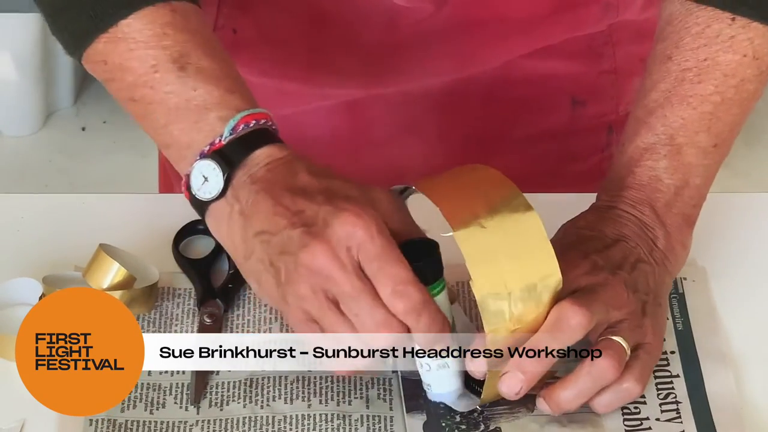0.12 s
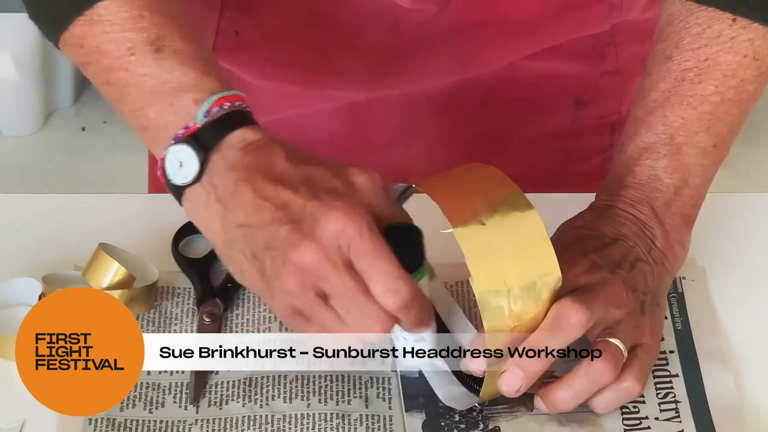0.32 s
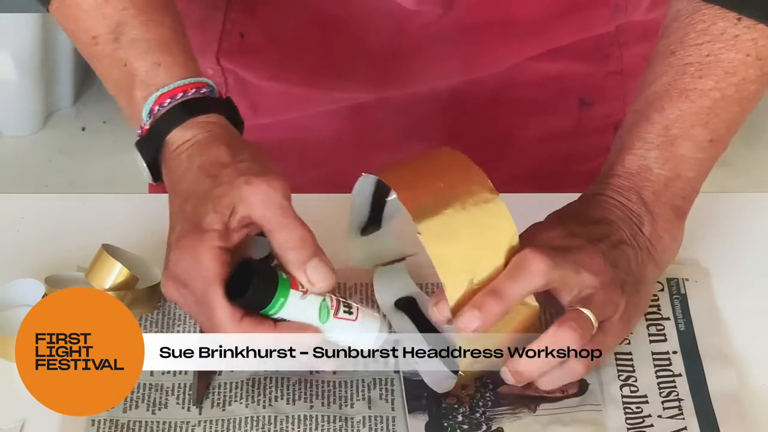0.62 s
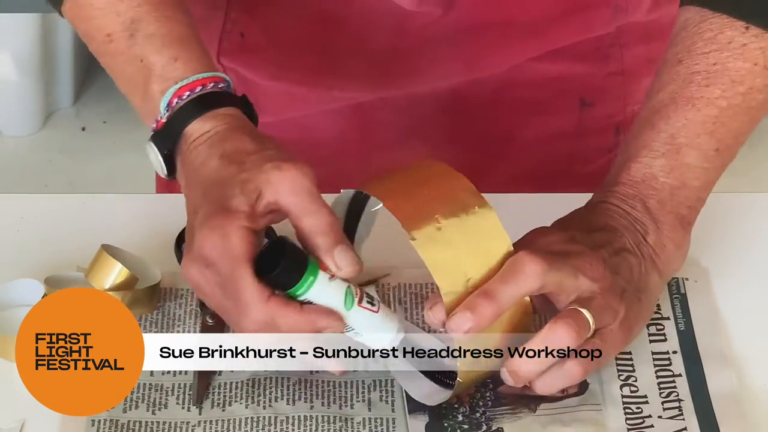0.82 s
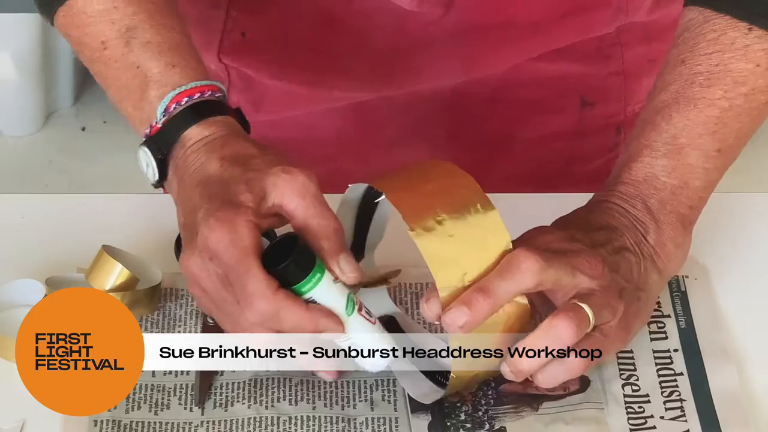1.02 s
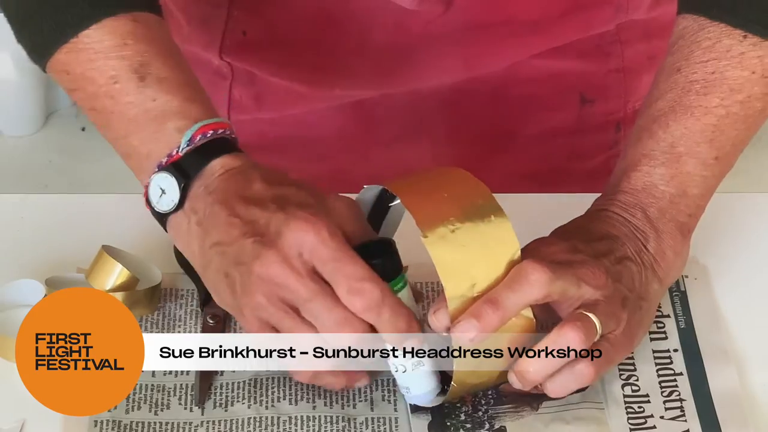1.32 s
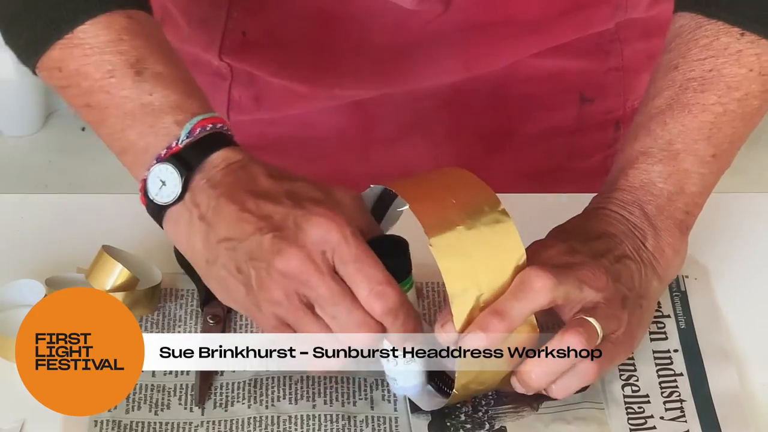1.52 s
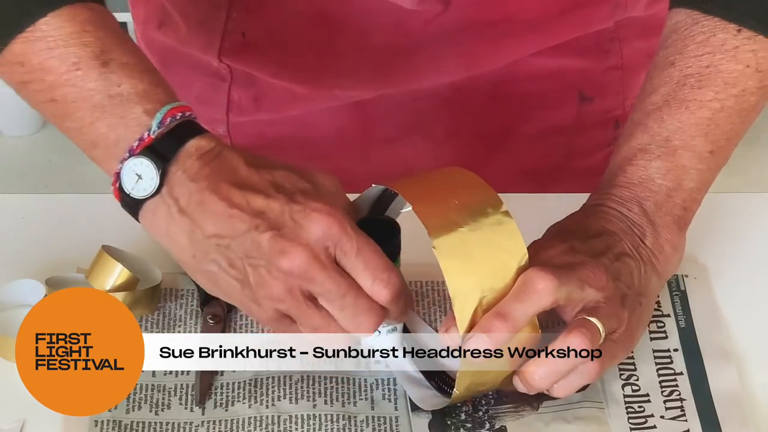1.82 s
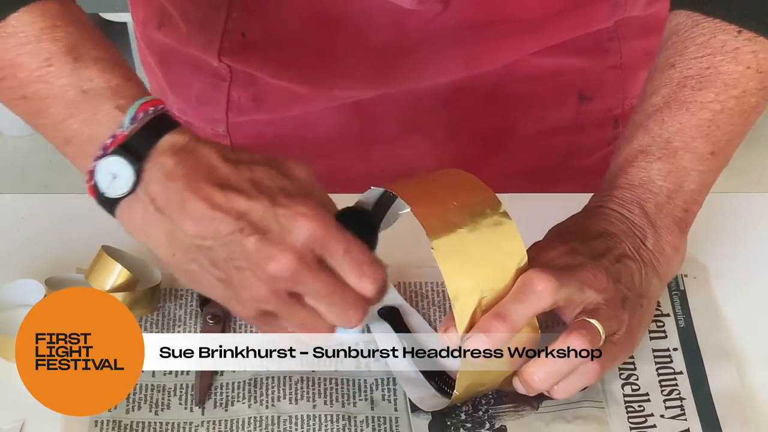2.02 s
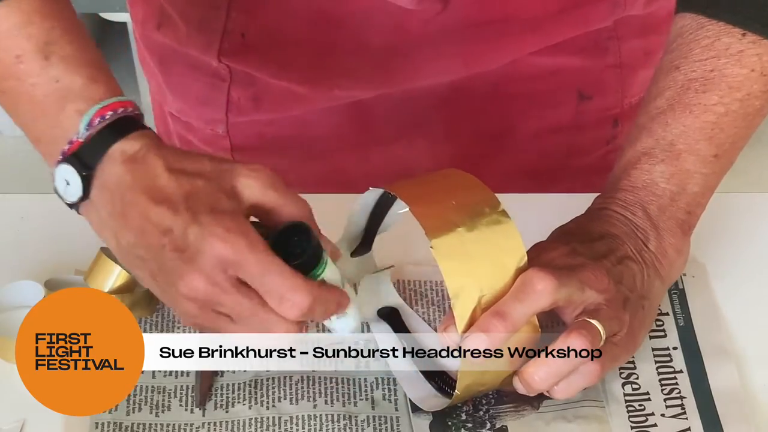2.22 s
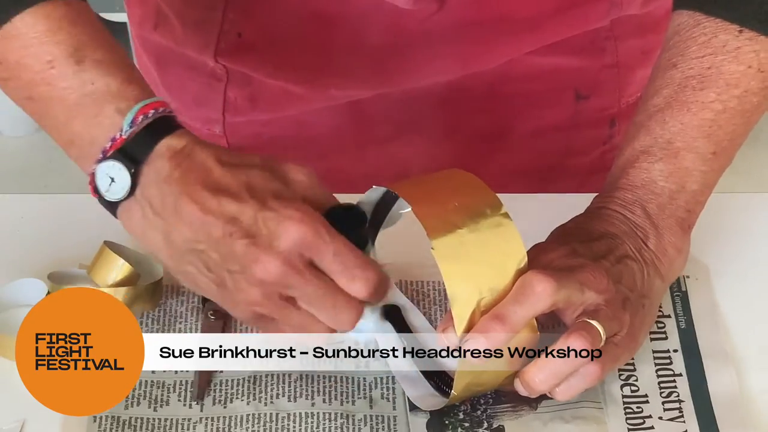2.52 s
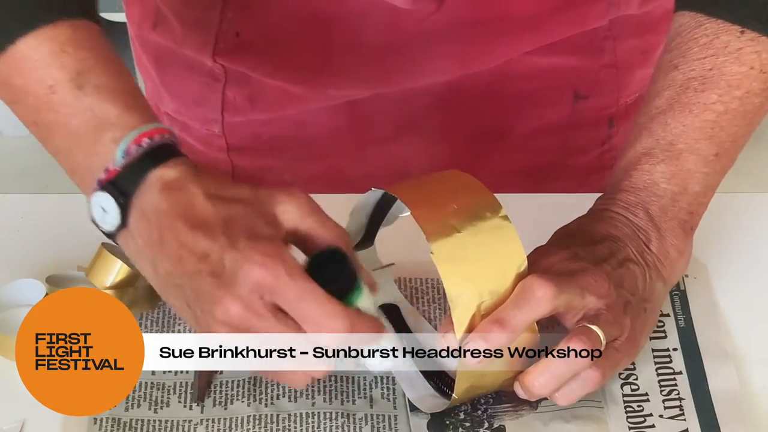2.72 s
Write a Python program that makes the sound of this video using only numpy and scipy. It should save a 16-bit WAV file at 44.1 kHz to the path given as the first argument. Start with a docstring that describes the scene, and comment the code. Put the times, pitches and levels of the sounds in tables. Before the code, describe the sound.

Close, dry foil crackles, a sharp cluster first, scattered small ticks, a quiet gap, another bright snap, faint sticky slides and a run of low hand thuds on a table, in a small indoor room with wavering hum.

```python
"""A low, unevenly wavering rumble and a faint rustle, then sharp foil snaps, in a bare room.
A glue stick is dabbed and dragged along stiff foil paper bent into a band on a table.
Snaps are bursts into resonators, rustle is dense random grains, the sticky tip's slides are gliding
noise bands, and a hand's bumps, mostly one quick run, ring the table's modes. The rumble is a narrow
noise band in level lumps. Two microphone ports hear the treble with a phase lag between them."""
import sys
import numpy as np
from scipy import signal
from scipy.fft import rfft, irfft, next_fast_len
from scipy.io import wavfile
from scipy.ndimage import uniform_filter1d

SR = 44100
rng = np.random.default_rng(int(sys.argv[2]) if len(sys.argv) > 2 else 0)


def level_to_linear(level):
    """Convert decibel levels to linear amplitude factors, elementwise."""
    exponent = np.asarray(level, float) / 20
    return 10 ** exponent


def to_wav(s):
    """Save 16-bit WAV."""
    ch = np.atleast_2d(s).T  # columns
    pcm = np.round(np.clip(ch, -1, 1) * 32767)  # PCM
    wavfile.write(sys.argv[1], SR, pcm.astype(np.int16))


N = 125685

# room floor spectrum: hz, level_db_per_hz
AIR_SPECTRUM = [(20, -24), (66, -13), (105, -9.5), (174, -47.5), (511, -27), (889, -38.5), (1730, -40),
                (5240, -49), (13400, -54), (15000, -54)]
# random level lumps of the rumble's narrow noise band: peak_db, centre_s
RUMBLE_LUMPS = [(-43, 0.012), (-53, 0.168), (-53.5, 0.505), (-44, 0.69), (-49.5, 0.952), (-53, 1.149),
                (-45.5, 1.328), (-53, 1.43), (-57.5, 1.792), (-48, 1.973), (-48, 2.235), (-53.5, 2.35),
                (-38.5, 2.499), (-45, 2.679), (-52.5, 2.819)]
# reverberation: hz, t60_s
ROOM_DECAY = [(1400, 0.47), (3700, 0.44), (9700, 0.26), (15000, 0.12)]
# left-right likeness of diffuse sound: hz, likeness_0_to_1
STEREO_LIKENESS = [(60, .9), (250, .8), (600, .3), (3000, .1), (6500, .1), (8000, .97), (15000, .97)]
# hand contacts on the table: start_s, level_db
TABLE_BUMPS = [(2.426, -29.5), (2.445, -28), (2.465, -29.5), (2.497, -33.5), (2.524, -34), (1.869, -43.5)]
# table top modes: pitch_hz, level_db, t60_s
TABLE_MODES = [(106.5, -20.5, 0.3), (153.6, -1, 0.1), (203.5, -2.5, 0.1), (269.9, 0, 0.1), (342, -8.5, .07),
               (431.3, -9, 0.07), (560, -14, 0.05)]
# sticky tip strokes: start_hz, end_hz, start_s, end_s, level_db
TIP_SLIDES = [(3150, 4250, 1.1, 1.36, -76), (4200, 4400, 1.3, 1.58, -73), (6770, 7100, 1.63, 1.85, -75),
              (4480, 4614, 2.147, 2.38, -68), (3720, 3640, 2.29, 2.49, -64), (4250, 3650, 2.26, 2.34, -67)]
# noise bandwidth of each stroke: width_hz
TIP_WIDTHS = [600, 800, 410, 1200, 130, 250]
# bent band resonances: pitch_hz, width_hz
BAND_RESONANCES = [(730, 60), (1220, 240), (1600, 90), (2350, 200), (2880, 200), (3730, 240), (4560, 300)]
# rustling rubs: start_s, length_s, body_db, body_centre_hz, treble_db
FOIL_RUBS = [(-.1, 0.23, -63, 1490, -99.5), (0.197, 0.044, -43, 1260, -36), (0.21, 0.15, -44, 3730, -41),
             (0.423, 0.1, -51, 1220, -66.5), (0.58, 0.034, -57, 2760, -53.5), (0.578, 0.093, -55, 480, -71),
             (0.909, 0.059, -57.5, 3190, -57), (1.149, 0.015, -94, 5930, -65),
             (1.299, 0.03, -65, 4330, -60), (1.36, 0.027, -70.5, 4870, -58.5),
             (1.441, 0.03, -65.5, 4640, -59.5), (1.527, 0.073, -70.5, 3690, -57.5),
             (1.548, 0.16, -68, 2000, -70), (1.756, 0.033, -77, 4440, -53), (1.8646, 0.06, -45, 4600, -31),
             (1.873, 0.24, -67.5, 1180, -53), (1.927, 0.18, -52, 4100, -51.5),
             (0.692, 0.17, -59, 3500, -69.5), (2.222, 0.28, -66.5, 1972, -83.5),
             (2.456, 0.06, -71, 5920, -54), (2.485, 0.049, -58.5, 760, -45),
             (2.533, 0.1, -58.5, 3700, -47.5)]
# rub body spectrum: hz, level_db_per_hz
BODY_SPECTRUM = [(250, -20.5), (500, 0), (1000, 3), (3000, -6.5), (6000, -2), (9000, -18), (16000, -48.5)]
# rub treble spectrum: hz, level_db_per_hz
TREBLE_SPECTRUM = [(3500, -7.5), (6000, -3), (8000, 0), (10500, -1), (14500, -4), (15300, -31)]
# foil snaps: start_s, body_peak_db, body_pitch_hz, treble_peak_db
FOIL_SNAPS = [(0.134, -46.5, 909, -90), (.198, -36.5, 1240, -29), (0.2141, -24.5, 1260, -15.5),
              (0.2201, -33, 4560, -7.5), (0.231, -42, 4400, -33.5), (0.238, -45, 1250, -21),
              (.300, -25, 2180, -56), (0.3048, -29, 2830, -41.5), (0.4444, -34.5, 1250, -61),
              (0.4441, -33.5, 2960, -64), (0.478, -30.5, 2524, -60), (0.6893, -23, 3924, -55.5),
              (.690, -41.5, 1480, -70), (0.693, -30, 2730, -61.5), (1.555, -62, 3980, -45.5),
              (1.864, -32, 2300, -15), (1.8661, -30.5, 1096, -23.5), (1.91, -26.5, 3960, -36),
              (1.917, -30, 3780, -42), (2.021, -31, 2990, -45), (2.546, -35, 3620, -40),
              (2.8465, -34.5, 1300, -78)]
# treble colour of the snaps as the microphone hears it, bright bands: centre_hz, width_hz, level_db
SNAP_TREBLE_BANDS = [(7470, 380, -2), (10400, 1100, 4.5), (13200, 5300, 2)]
# phase between the microphone ports: hz, left_lead_rad
PORT_LEAD = [(20, 0), (6500, 0), (8750, -np.pi), (10300, -2 * np.pi), (11850, -3 * np.pi),
             (15000, -5 * np.pi), (22050, -9 * np.pi)]

AIR_DB = -62.5
RUMBLE_HZ, RUMBLE_WIDTH_HZ, RUMBLE_SIDE_DB = 106, 10.7, -12
LUMP_S, BETWEEN_LUMPS_DB = 0.037, -57
ROOM_DB, ROOM_GAP_S = -4, 0.0046
ROOM_TREBLE_DB_PER_OCTAVE = -0.5  # for band lower edges above 2 kHz
CONTACT_SPREAD_S, MODE_SPREAD_DB = 0.00274, 2
TABLE_PAN_DB, TABLE_TO_ROOM_DB = -1.94, -14
SLIDE_FADE_S, SLIDE_SAG_DB = 0.045, -5
BAND_DIRECT_DB = -9
GRAINS_PER_S, GRAIN_SPREAD_DB, FLICKER_DB = 6000, 2, 2.5
RUB_FALL_S, RUB_SAG_DB, RUB_WIDE_DB, RUB_Q = 0.027, -9.5, -0.5, 2.6
RUB_RISE_S, RISE_REFERENCE_DB, RISE_PER_DB = 0.003, -42.5, 1.3  # softer rubs rise slower
SNAP_DECAY_S, SNAP_ROUGHNESS, SNAP_SAMPLES = 0.0012, 0.8, 400
SNAP_Q, EDGE_DB = 2.5, -13.5


def rms_one(x):
    """Scales to unit rms."""
    return x / np.sqrt(np.mean(x ** 2) + 1e-20)


def at_hz(points, size):
    """Reads a table on the FFT grid of that many samples, over log frequency."""
    hz, value = np.transpose(points)
    grid_hz = np.arange(size // 2 + 1) * SR / size
    return np.interp(np.log(grid_hz + 1), np.log(hz), value)


def colour(x, spectrum):
    """Shapes noise to a spectrum at unit rms."""
    return rms_one(irfft(rfft(x) * level_to_linear(at_hz(spectrum, N)), N))


def resonance(x, hz, width_hz):
    """One damped mode: a two-pole resonator."""
    r = np.exp(-np.pi * width_hz / SR)
    zeros = np.array([1, 0, -1]) * (1 - r * r) / 2
    poles = [1, -2 * r * np.cos(2 * np.pi * hz / SR), r * r]
    return signal.lfilter(zeros, poles, x)


def pair(two):
    """Left and right from two unrelated signals, as alike as each frequency allows."""
    size = two.shape[1]
    alike = np.clip(at_hz(STEREO_LIKENESS, size), 0, 1)
    mid, side = rfft(two)
    shared = np.sqrt((1 + alike) / 2) * mid
    opposed = np.sqrt((1 - alike) / 2) * side * [[1], [-1]]
    return irfft(shared + opposed, size)


def air():
    """Room floor: steady coloured noise in diffuse stereo."""
    return level_to_linear(AIR_DB) * pair(colour(rng.standard_normal((2, N)), AIR_SPECTRUM))


def rumble():
    """A narrow low noise band, perhaps a distant machine, wavering unevenly in level lumps."""
    noise = rng.standard_normal((2, N + SR))  # the first second settles the filters
    band = resonance(noise, RUMBLE_HZ, RUMBLE_WIDTH_HZ)
    band = resonance(band, RUMBLE_HZ, 61)[:, SR:]
    mid, side = band / np.sqrt(uniform_filter1d(band ** 2, size=2000) + 1e-12)
    t = np.arange(N) / SR
    level = level_to_linear(BETWEEN_LUMPS_DB)
    for db, centre_s in RUMBLE_LUMPS:
        level = level + level_to_linear(db) * np.exp(-((t - centre_s) / LUMP_S) ** 2 / 2)
    return level * (mid + level_to_linear(RUMBLE_SIDE_DB) * side * [[1], [-1]])


def room(x):
    """A diffuse tail: octave bands of noise, each dying at its own rate."""
    t, tail = np.arange(SR) / SR, 0
    white = rng.standard_normal((2, SR))
    hz, t60_s = np.transpose(ROOM_DECAY)
    for k, low_hz in enumerate(125 * 2. ** np.arange(7)):
        octave = signal.butter(2, [low_hz, 2 * low_hz], "band", fs=SR, output="sos")
        band = signal.sosfilt(octave, white)
        band_t60_s = np.interp(np.log(low_hz * np.sqrt(2)), np.log(hz), t60_s)
        treble_db = ROOM_TREBLE_DB_PER_OCTAVE * max(np.log2(low_hz / 2000), 0)
        tail = tail + (-1) ** k * band * level_to_linear(treble_db - 60 * t / band_t60_s)
    tail = pair(tail * (t > ROOM_GAP_S))
    tail = tail / np.sqrt((tail ** 2).sum() / 2)
    return level_to_linear(ROOM_DB) * signal.fftconvolve(x[None], tail, axes=1)[:, :N]


def bumps():
    """Soft rough contacts ring the table top's modes, each with its own strength and start."""
    out = np.zeros(N)
    luck = rng.standard_normal((len(TABLE_BUMPS), len(TABLE_MODES), 2))
    start_s, bump_db = np.transpose(TABLE_BUMPS)
    for k, (hz, mode_db, t60_s) in enumerate(TABLE_MODES):
        clicks = np.zeros(N) + 1e-18
        hit_s = start_s + CONTACT_SPREAD_S * np.abs(luck[:, k, 1])
        hit_db = bump_db + mode_db + MODE_SPREAD_DB * luck[:, k, 0]
        clicks[(hit_s * SR).astype(int)] = level_to_linear(hit_db) * (-1) ** k
        r, w = level_to_linear(-60 / (t60_s * SR)), 2 * np.pi * hz / SR
        out += signal.lfilter([0, np.sin(w)], [1, -2 * r * np.cos(w), r * r], clicks)
    return signal.sosfilt(signal.butter(3, [85, 700], "band", fs=SR, output="sos"), out)


def slides():
    """Sticky friction: a band of hiss whose pitch glides with the stroke."""
    out, t = np.zeros(N), np.arange(N) / SR
    for (from_hz, to_hz, start_s, end_s, db), width_hz in zip(TIP_SLIDES, TIP_WIDTHS):
        lowpass = signal.butter(2, width_hz / 2, fs=SR, output="sos")
        wobble = signal.sosfilt(lowpass, rng.standard_normal((2, N)))
        pitch_hz = np.interp(t, [start_s, end_s], [from_hz, to_hz])
        phase = 2 * np.pi * np.cumsum(pitch_hz) / SR
        hiss = rms_one(wobble[0] * np.cos(phase) + wobble[1] * np.sin(phase))
        fade = np.clip(np.minimum(t - start_s, end_s - t) / SLIDE_FADE_S, 0, 1)
        progress = np.clip((t - start_s) / (end_s - start_s), 0, 1)
        out += level_to_linear(db) * fade * level_to_linear(SLIDE_SAG_DB * progress) * hiss
    return out


def band_ring(x):
    """The bent band's resonances in parallel, over a little direct sound."""
    ring = sum(resonance(x, hz, width_hz) for hz, width_hz in BAND_RESONANCES)
    return level_to_linear(BAND_DIRECT_DB) * x + ring


def crease_grains():
    """Micro-creases: random impulses of uneven size with a flickering level."""
    size_db = GRAIN_SPREAD_DB * np.minimum(rng.exponential(1, (2, N)), 5)
    sizes = level_to_linear(size_db) * rng.standard_normal((2, N))
    grains = sizes * (rng.random((2, N)) < GRAINS_PER_S / SR)
    drift = uniform_filter1d(rng.standard_normal(N), size=300)
    drift = rms_one(uniform_filter1d(drift, size=300))
    return grains * level_to_linear(FLICKER_DB * drift)


def rustle():
    """Rubs of dense creases rise fast, sag and stop, with a body colour and a treble sheen."""
    grains = crease_grains()
    body = rms_one(band_ring(colour(grains, BODY_SPECTRUM)))
    treble = colour(grains, TREBLE_SPECTRUM)
    out = np.zeros((2, N))
    for start_s, length_s, db, hz, treble_db in FOIL_RUBS:
        part = slice(int(max(start_s, 0) * SR), int((start_s + length_s + RUB_FALL_S) * SR))
        t = np.arange(N)[part] / SR - start_s
        softness_db = RISE_REFERENCE_DB - max(db, treble_db)
        rise_s = min(RUB_RISE_S * level_to_linear(RISE_PER_DB * softness_db), length_s / 2)
        shape = np.clip(np.minimum(t / rise_s, 1 - (t - length_s) / RUB_FALL_S), 0, 1)
        shape = shape * level_to_linear(RUB_SAG_DB * t / length_s)
        narrow = rms_one(resonance(resonance(body[:, part], hz, hz / RUB_Q), hz, hz))
        tinted = narrow + level_to_linear(RUB_WIDE_DB) * body[:, part]
        out[:, part] += shape * (level_to_linear(db) * tinted + level_to_linear(treble_db) * treble[:, part])
    return pair(out)


def snaps():
    """A tiny burst excites the band near its pitch, with a bare edge and bright treble bands."""
    out, t = np.zeros(N + SNAP_SAMPLES), np.arange(SNAP_SAMPLES) / SR
    noise = rng.standard_normal((len(FOIL_SNAPS), SNAP_SAMPLES))
    bursts = SNAP_ROUGHNESS * noise * np.exp(-t / SNAP_DECAY_S) + (t == 0)
    for (start_s, db, hz, treble_db), burst in zip(FOIL_SNAPS, bursts):
        body = band_ring(resonance(resonance(burst, hz, hz / SNAP_Q), hz, 2 * hz / SNAP_Q))
        edge = resonance(resonance(burst, hz, 2 * hz), hz, 2 * hz)
        treble = 0
        for centre_hz, width_hz, level_db in SNAP_TREBLE_BANDS:
            bright = resonance(resonance(burst, centre_hz, width_hz), centre_hz, 2 * width_hz)
            treble = treble + level_to_linear(level_db) * bright
        start = int(start_s * SR)
        for part, peak_db in ((body, db), (edge, db + EDGE_DB), (treble, treble_db)):
            out[start:start + SNAP_SAMPLES] += level_to_linear(peak_db) * part / np.abs(part).max()
    return out[:N]


def scene():
    """Foil, rubs and table heard directly and through the room, over rumble and air."""
    foil, rubs, table = snaps() + slides(), rustle(), bumps()
    near = foil + rubs + table * level_to_linear([[TABLE_PAN_DB], [-TABLE_PAN_DB]])
    to_room = foil + rubs[0] + level_to_linear(TABLE_TO_ROOM_DB) * table
    return near + room(to_room) + rumble() + air()


def microphone_ports(x):
    """The two ports shift the treble's phase against each other, half each way."""
    size = next_fast_len(N + 2000)
    hz, lead_rad = np.transpose(PORT_LEAD)
    lead_rad = np.interp(np.arange(size // 2 + 1) * SR / size, hz, lead_rad)
    turn = np.exp(1j * lead_rad * [[.5], [-.5]])
    return irfft(rfft(x, size) * turn, size)[:, :N]


def top_cut(x):
    """Nothing passes above the cut-off."""
    return signal.sosfilt(signal.butter(12, 16470, fs=SR, output="sos"), x)


def record(dry):
    """Picks the scene up at the two ports."""
    mix = microphone_ports(dry)
    return top_cut(mix)


dry = scene()
out = record(dry)
to_wav(out)
```